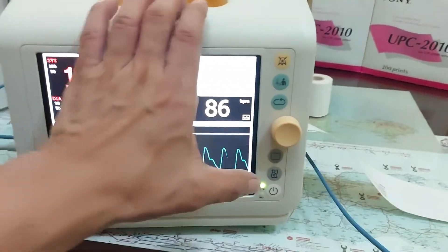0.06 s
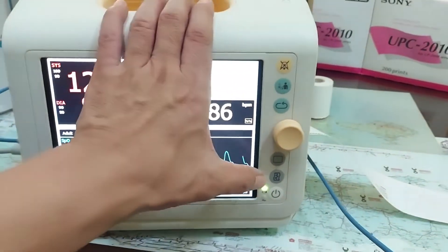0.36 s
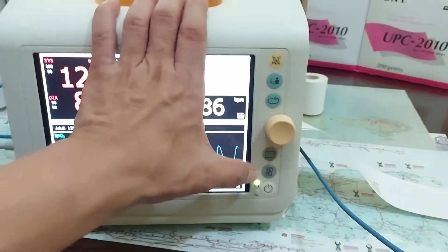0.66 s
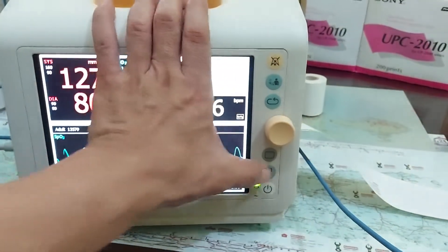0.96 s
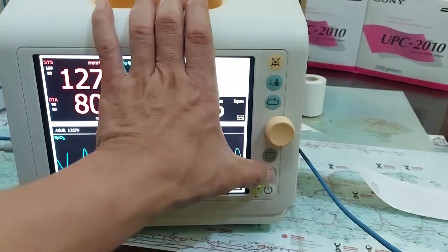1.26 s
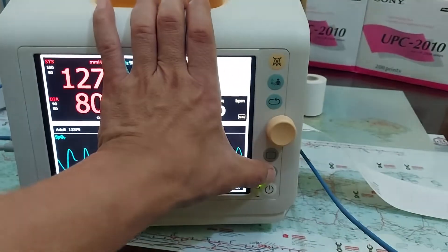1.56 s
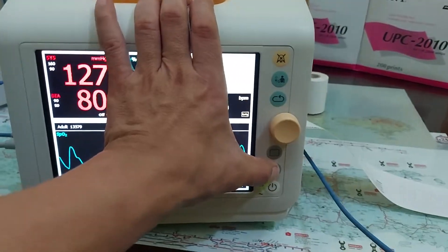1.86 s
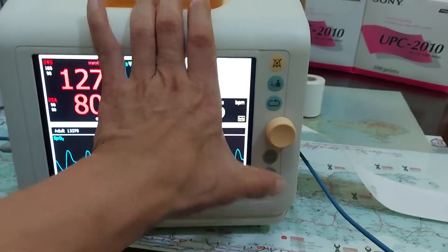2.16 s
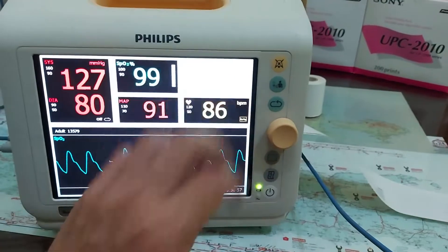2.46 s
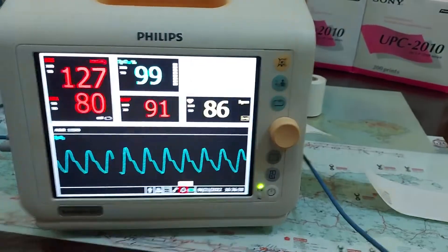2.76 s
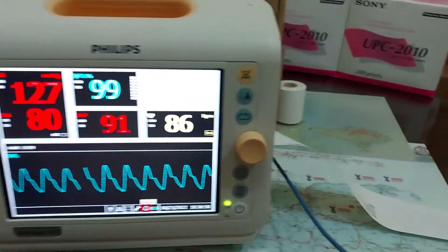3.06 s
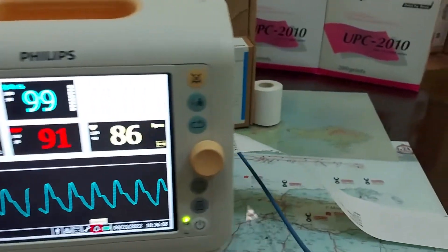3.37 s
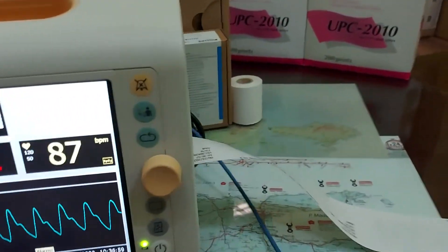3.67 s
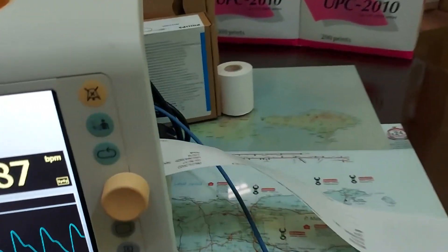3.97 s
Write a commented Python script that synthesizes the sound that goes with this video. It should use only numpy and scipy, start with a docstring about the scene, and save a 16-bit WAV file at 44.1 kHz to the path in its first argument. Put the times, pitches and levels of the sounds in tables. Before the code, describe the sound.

A small printer clacks on and buzzes steadily after faint hand taps on plastic.

```python
"""A bedside monitor's thermal printer starts with a clack: its stepper motor buzzes steadily,
gears chatter and paper rubs through the slot. The microphone drifts towards the printer, so the
upper buzz grows clearer. A hand resting on the plastic case makes a few bumps, tiny ticks and soft
swishes. Behind it all, the monitor's fan hums in the small room."""
import sys
import numpy as np
from scipy import signal
from scipy.fft import rfft, irfft, next_fast_len
from scipy.io import wavfile
from scipy.ndimage import map_coordinates

SR = 44100
rng = np.random.default_rng(int(sys.argv[2]) if len(sys.argv) > 2 else 0)


def dump(signal):
    """Clip the signal to [-1, 1] and save it as 16-bit WAV at the path in sys.argv[1]."""
    limited = np.clip(np.atleast_2d(signal).T, -1, 1)
    pcm = np.round(limited * 32767).astype(np.int16)
    wavfile.write(sys.argv[1], SR, pcm)


N = 176400

# motor tone at the step rate: (time [s], level [dB])
MOTOR_TONE = [(2.28, -66), (2.33, -46.5), (2.46, -43), (2.7, -46), (2.95, -44), (3.13, -41.5), (3.25, -48),
              (3.45, -44.5), (4.0, -47)]
# tones heard while the printer runs, motor overtones and a low hum near 300 Hz:
# (multiple of the coil cycle rate, level far away [dB], level close up [dB])
RUNNING_TONES = [(1.998, -63.5, -68), (2.99, -62.5, -70), (4.21, -66, -69), (5.96, -66.5, -57.5),
                 (7.005, -63, -60), (7.79, -70.0, -69), (8.01, -59, -58.5), (8.18, -64.0, -63.5),
                 (9, -59.5, -64.5), (10.02, -57.5, -64.5), (11, -64.5, -64), (12, -71, -67.5),
                 (12.78, -69, -71), (13.06, -64.5, -66.5), (14, -72, -63), (15.07, -75, -67),
                 (15.2, -72, -67), (16, -66, -59), (17.35, -68, -67.5), (18.02, -63, -60.5),
                 (20.16, -71, -70.5), (20.93, -70, -70), (23.1, -74, -74.5), (24, -74, -71.5),
                 (25.94, -72.0, -69), (27, -81, -72), (28, -86, -67), (29.9, -68, -66), (34.08, -76, -66),
                 (34.83, -73.5, -69), (35.7, -85.0, -71.0), (37, -81, -69.0), (39, -70.5, -66),
                 (40, -85.5, -70), (41, -78, -78), (42, -71.5, -68), (43, -87, -76), (43.64, -79.5, -72),
                 (45.9, -76, -74), (47.9, -88, -80), (49, -84, -75.5), (53, -81, -79.5), (55.3, -81, -76)]
# narrow bands of ringing hiss that swell and fade while the printer runs:
# (start [s], length [s], pitch [Hz], level [dB])
RINGING_HISSES = [(2.39, 0.1, 2200, -55), (3.06, .11, 2130, -54), (2.97, 0.76, 4440, -64.5),
                  (2.76, 2.4, 9900, -70)]
# bumps on the case: (time [s], level [dB], brightness [dB per octave])
CASE_BUMPS = [(1.085, -46.5, -5), (1.41, -44.5, -1.5), (1.82, -39, 2.5), (2.126, -41, -1),
              (2.776, -34, -0.5), (2.812, -41.5, -6), (3.138, -46, 4)]
# notes the case rings at: (pitch [Hz], level [dB], time to fade by 60 dB [s])
CASE_NOTES = [(163, -16, 0.12), (296.5, -5, 0.11), (342.3, -0.5, 0.094), (438, -2, 0.03),
              (728, -9.5, 0.038), (1126, -13.5, 0.037), (1620, -18.5, 0.038)]
# sharp little ticks: (time [s], level [dB], left over right [dB])
TICK_HITS = [(.1214, -37.5, 15), (.2898, -39.5, 15), (.9967, -46, 15), (1.0478, -34, 20), (1.1078, -44, 8),
             (1.1469, -33, 14), (1.4587, -42, 14), (1.6206, -48, 15), (2.0016, -40.5, 16),
             (2.4731, -25.5, 1)]
# noises that swell and fade: (start [s], level [dB], rise [s], time to fade by 60 dB [s])
RUSTLE_STROKES = [(2.147, -50, 0.0031, 0.42), (2.275, -48, 0.007, 0.23), (2.40, -48, 0.041, 0.62),
                  (2.76, -51, 0.0064, 0.4), (2.808, -49, 0.019, 0.23), (2.99, -52.5, 0.019, 0.4),
                  (3.08, -52.5, .025, 0.24)]  # paper and hand on the case
THUD_STROKES = [(.21, -57, 0.03, .25), (.33, -55, 0.033, 0.25), (1.42, -58, 0.08, 1.5),
                (1.595, -53.5, 0.028, .4), (2.77, -57, 0.036, 0.45)]  # low rumbles from handling
SHUDDER_STROKES = [(2.17, -50, 0.04, 0.55), (2.44, -45, 0.055, 0.33), (2.82, -50.5, .02, .3),
                   (3.11, -45, 0.059, 0.44)]  # the case shakes as the hand slides off
# swishes: (start [s], level [dB], rise [s], time to fade by 60 dB [s], band [Hz], band gain [dB])
SWISH_STROKES = [(-.03, -63.5, 0.021, 0.59, 3000, -1), (.125, -63, 0.03, 1, 3360, 8),
                 (1.0, -63, 0.026, 0.99, 4700, 7.5), (1.337, -64, 0.059, 0.88, 2090, 3),
                 (1.7, -62, 0.027, 0.83, 7750, 3), (2.048, -62, .02, 1, 2140, 2)]
# thin, rising hiss: (start [s], length [s], middle pitch [Hz], level [dB])
THIN_HISSES = [(-.25, 0.97, 5920, -76), (0, 0.66, 3980, -75)]
# hum of the fan's rotor: (pitch [Hz], level [dB])
FAN_TONES = [(85.3, -63.5), (170.6, -62), (199.8, -68.5)]
# each sound's colour, its balance of low and high: (frequency [Hz], relative level [dB])
GEAR_COLOUR = [(150, -27), (400, -7.5), (800, -1), (1750, -3), (2500, -13), (4300, -10.5), (6000, -26.5),
               (16000, -65)]
PAPER_COLOUR = [(120, -73), (200, -20), (249, -14.5), (401, -2), (456, -17.5), (529, -18), (806, -16),
                (1180, -27.5), (1740, -21), (2290, -29.5), (10300, -40.5), (14100, -45), (16000, -81)]
CLACK_COLOUR = [(200, -15), (700, -2), (1150, 6.5), (2300, 2.5), (3500, -10), (6500, -5), (9000, -17),
                (11000, -10), (16000, -35)]
TICK_COLOUR = [(1000, -40), (3500, -4), (6500, -1.5), (10000, 0.5), (13000, -4.5), (16000, -17)]
RUSTLE_COLOUR = [(100, 1.5), (1100, 0), (2200, -4), (3000, -8), (5000, -12.5), (7500, -23), (11000, -19),
                 (16000, -36)]
THUD_COLOUR = [(20, -38), (45, -10), (65, 0.5), (110, -5.5), (250, -48), (1000, -80)]
SHUDDER_COLOUR = [(80, -35), (170, -10), (240, -14.5), (315, 2.5), (380, -7.5), (480, -13.5), (900, -19),
                  (3000, -50)]
SWISH_COLOUR = [(300, -14), (600, 7), (1200, 0), (1650, 2), (2200, 3.5), (2800, -4.5), (4000, -3.5),
                (5000, -8), (6100, -5.5), (7200, -10.5), (10000, -10.5), (16000, -19.5)]
FAN_COLOUR = [(20, -51), (45, -15), (178, -17), (214, -25), (250, -14), (345, -1.5), (385, -5.5),
              (478, -15), (530, -24.5), (650, -21), (770, -28.5), (900, -22.5), (1030, -20), (1200, -34.5),
              (1620, -29.5), (2280, -40), (3900, -48.5), (7500, -53), (10800, -44.5), (16000, -53.5)]
# how alike left and right sound: (frequency [Hz], likeness [0 to 1])
LIKENESS = [(60, 0.86), (290, 0.93), (640, 0.51), (1410, 0.066), (3100, 0.029), (15000, 0.019)]

STEP_HZ, STEPS_PER_CYCLE, STEPS_PER_TURN = 400.1, 4, 20
START_S, FULL_SPEED_S, FADE_IN_S, BUZZ_RISE_S = 2.145, 2.31, 0.027, 0.3
APPROACH_S = (2.98, 3.67)  # the microphone moves closer between these times
MOTOR_LAG_S, CLICK_LAG_S = 0.00021, 0.0003  # the right side hears these a little later
BUZZ_DB, GEARS_DB, PAPER_DB, FAN_DB = -1.5, -57.5, -51.5, -53


def printer():
    """A motor moves in tiny steps, turning the gears and jerking the paper through the slot."""
    t = clock()
    steps = np.cumsum(STEP_HZ * (1 + 0.00069 * wobble(25))) / SR  # steps taken so far
    turns = steps / STEPS_PER_TURN
    far = np.interp(t, APPROACH_S, [1, 0])
    whine = motor(steps, far)
    # the level pulses every second step and sways by 1 dB each turn
    jerks = unit(np.exp(0.2 * np.cos(np.pi * steps)) * amp(np.cos(2 * np.pi * turns)))
    gears = amp(GEARS_DB - far) * coloured(gear_chatter(turns) * jerks, GEAR_COLOUR)
    paper_gain = amp(PAPER_DB + 0.87 * wobble(12))
    paper = paper_gain * coloured(rng.standard_normal((2, N)) * jerks, PAPER_COLOUR)
    running = ramp(START_S, FADE_IN_S)
    return whine + running * (gears + paper) + narrow_hiss(RINGING_HISSES, width=0.11, rise_per_s=0)


def motor(steps, far):
    """The steps make a tone and a buzz, heard with a low hum; the mix shifts as the microphone nears."""
    stereo_steps = steps - np.array([[0], [MOTOR_LAG_S * STEP_HZ]])
    tone_db = np.interp(clock(), *np.transpose(MOTOR_TONE)) + 0.48 * wobble(22.13)
    tone = ramp(FULL_SPEED_S - FADE_IN_S, FADE_IN_S) * amp(tone_db) * np.sin(2 * np.pi * stereo_steps)
    buzz = np.zeros((2, N))
    for multiple, far_db, near_db in RUNNING_TONES:
        hz = multiple * STEP_HZ / STEPS_PER_CYCLE
        unlike = 1 - np.clip(along(LIKENESS, hz), 0, 1)
        phase = 2 * np.pi * (multiple * stereo_steps / STEPS_PER_CYCLE + rng.random())
        phase += 1.3 * unlike * np.array([wobble(2.49), wobble(2.5)])
        flutter_db = 2.5 * min(hz / 3000, 1) * wobble(16)  # high tones waver most
        drift_db = 1.5 * np.array([wobble(2.41), wobble(2.44)])
        buzz += amp(far * far_db + (1 - far) * near_db + flutter_db + drift_db) * np.sin(phase)
    return np.sqrt(2) * (tone + amp(BUZZ_DB) * ramp(START_S, BUZZ_RISE_S) * buzz)


def gear_chatter(turns):
    """The same teeth meet on every turn, so one short piece of noise repeats."""
    teeth = rng.standard_normal((2, int(SR * STEPS_PER_TURN / STEP_HZ)))
    return np.array([np.interp(turns % 1 * len(row), np.arange(len(row)), row) for row in teeth])


def clack(crack_db=-29.5, ring_hz=1100, ring_db=-46.5, ring_s=0.12):
    """The printer engages: a sharp crack, a short rattle and one ringing note."""
    t = np.maximum(clock() - START_S, 0)
    ring = amp(ring_db - 60 * t / ring_s) * np.sin(2 * np.pi * ring_hz * t)
    return ring + cracks([(START_S - .0005, crack_db, 0)], CLACK_COLOUR, fade_s=0.012, rattle_db=-10.5)


def bumps(onset_s=0.00087):
    """Each bump rings the plastic case, some brightly and some dully."""
    out = np.zeros(N)
    for start, db, brightness in CASE_BUMPS:
        t = np.maximum(clock() - start, 0)
        onset = 1 - np.exp(-t / onset_s)
        for hz, note_db, fade_s in CASE_NOTES:
            struck_db = db + note_db + brightness * np.log2(hz / 345) + rng.normal(0, 3.5)
            out += onset * amp(struck_db - 60 * t / fade_s) * np.sin(2 * np.pi * hz * t)
    return np.array([out, out])


def handling():
    """Hand and paper rustle on the case, which rumbles and shudders under the hand."""
    return (strokes(RUSTLE_STROKES, RUSTLE_COLOUR, grain_db=1.5)
            + strokes(THUD_STROKES, THUD_COLOUR, grain_db=4.5)
            + strokes(SHUDDER_STROKES, SHUDDER_COLOUR, grain_db=0.5))


def swishes(width=0.12):
    """The hand brushes the case; each swish has one band of pitches turned up or down."""
    out = np.zeros((2, N))
    for *stroke, hz, band_db in SWISH_STROKES:
        brush = strokes([stroke], SWISH_COLOUR, grain_db=1.5)
        out += filtered(brush, lambda f: amp(band_db / (1 + ((f / hz - 1) / width) ** 2)))
    return out


def fan():
    """Air rushes through the hollow case while the rotor hums."""
    hum = sum(amp(db + wobble(4.92)) * np.sin(2 * np.pi * hz * clock() + 0.39 * wobble(3.37))
              for hz, db in FAN_TONES)
    return hum + amp(FAN_DB + 1.6 * wobble(18)) * rush(FAN_COLOUR)


def room(x, fade_s=0.43, echo_db=-2.5):
    """The walls add a short echo."""
    t = np.arange(SR // 2) / SR
    tail = rng.standard_normal((2, len(t))) * amp(-60 * t / fade_s)
    return x + amp(echo_db) * signal.fftconvolve(x, tail / np.linalg.norm(tail[0]), axes=1)[:, :N]


def cracks(rows, colour, fade_s, rattle_db):
    """One sharp click for each row, followed by a short rattle."""
    out = np.zeros((2, N))
    for time, db, left_db in rows:
        for side, (start, level) in enumerate([(time, db), (time + CLICK_LAG_S, db - left_db)]):
            t = (np.arange(N) - round(start * SR)) / SR
            rattle = (t > 0) * amp(rattle_db - 60 * np.abs(t) / fade_s) * rng.standard_normal(N)
            out[side] += amp(level) * ((t == 0) + rattle)
    return filtered(out, lambda hz: amp(along(colour, hz)) / np.mean(amp(along(colour, hz))))


def strokes(rows, colour, grain_db):
    """Grainy noise that rises and dies away once for each row."""
    power = np.zeros(N)
    for start, db, rise_s, fade_s in rows:
        fallen_db = 60 * np.maximum(clock() - start - rise_s, 0) / fade_s
        power += (amp(db - fallen_db) * ramp(start, rise_s)) ** 2
    return np.sqrt(power) * unit(amp(grain_db * wobble(250))) * rush(colour)


def narrow_hiss(rows, width, rise_per_s):
    """Hiss around one pitch swells and fades; width and rise are shares of that pitch."""
    out = np.zeros((2, N))
    for start, length, hz, db in rows:
        progress = ramp(start, length)
        phase = 2 * np.pi * np.cumsum(hz * (1 + rise_per_s * length * (progress - .5))) / SR
        a, b = filtered(rng.standard_normal((2, 2, N)), lambda f: 1 / (1 + (f / (width * hz)) ** 2))
        hiss = unit(a * np.cos(phase) + b * np.sin(phase))  # low noise moved up to the pitch
        out += amp(db) * np.sin(np.pi * progress) ** 2 * hiss
    return out


def rush(colour):
    """Steady stereo noise of the given colour."""
    return coloured(rng.standard_normal((2, N)), colour)


def coloured(pair, colour):
    """Blend two unrelated signals into one stereo sound of this colour, alike in the bass."""
    def gains(hz):
        angle = np.arccos(np.clip(along(LIKENESS, hz), -1, 1)) / 2
        return amp(along(colour, hz)) * [np.cos(angle), np.sin(angle)]
    mid, side = filtered(pair, gains)
    return np.array([mid + side, mid - side]) / np.std(mid)


def filtered(x, gain_at):
    """Turn each frequency up or down by its own gain."""
    size = next_fast_len(N + SR // 2)
    return irfft(rfft(x, size) * gain_at(np.fft.rfftfreq(size, 1 / SR)), size)[..., :N]


def wobble(rate):
    """A smooth curve through `rate` random values a second."""
    coarse = np.linspace(0, N / SR, 4000)
    values = rng.standard_normal(int(N * rate / SR) + 4)
    return np.interp(clock(), coarse, map_coordinates(values, [coarse * rate]))


def along(points, hz):
    """Read between the rows of a frequency table, with octaves evenly spaced."""
    freqs, values = np.transpose(points)
    return np.interp(np.log(hz + 1), np.log(freqs + 1), values)


def panned(x, left_db):
    """Make the left side louder than the right."""
    return x * amp([[left_db / 2], [-left_db / 2]])


def ramp(start, length):
    """Climb from 0 to 1, then stay there."""
    return np.clip((clock() - start) / length, 0, 1)


def amp(db):
    """Turn decibels into a gain."""
    return 10 ** (np.asarray(db) / 20)


def unit(x):
    """Scale to an average power of 1."""
    return x / np.sqrt(np.mean(x ** 2) + 1e-20)


def clock():
    """Time of each sample, in seconds."""
    return np.arange(N) / SR


def scene():
    """All the sounds together, a little louder on the left."""
    hits = room(bumps() + clack())
    ticks = cracks(TICK_HITS, TICK_COLOUR, fade_s=0.0047, rattle_db=-14.5)
    hand = handling()
    hiss = swishes() + narrow_hiss(THIN_HISSES, width=0.065, rise_per_s=0.16)
    return (panned(printer(), left_db=3.5) + panned(hits + hand + fan(), left_db=4)
            + panned(hiss, left_db=4.5) + ticks)


def record(dry, low_hz=25, top_hz=16000):
    """The microphone drops the deepest bass and the highest treble."""
    low_cut = filtered(dry, lambda hz: 1 / np.sqrt(1 + (low_hz / (hz + 1)) ** 8))
    return filtered(low_cut, lambda hz: hz < top_hz)


dry = scene()
out = record(dry)
dump(out)
```